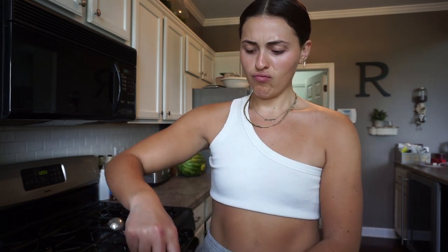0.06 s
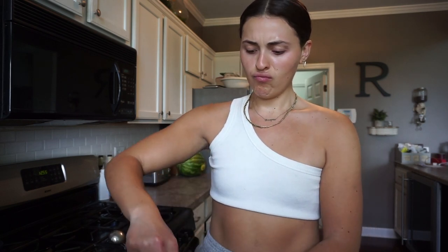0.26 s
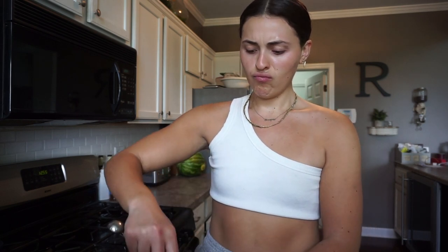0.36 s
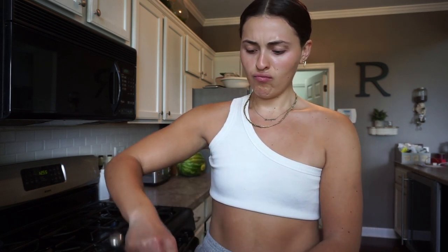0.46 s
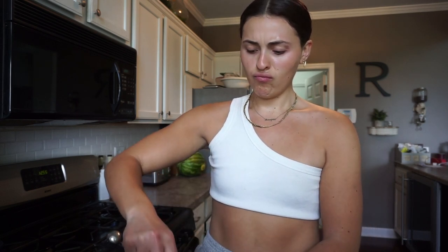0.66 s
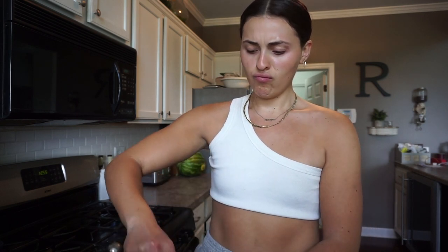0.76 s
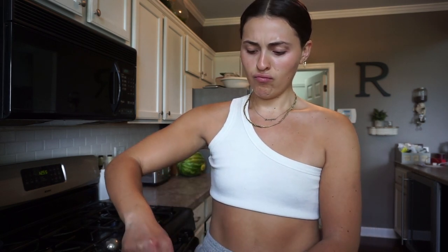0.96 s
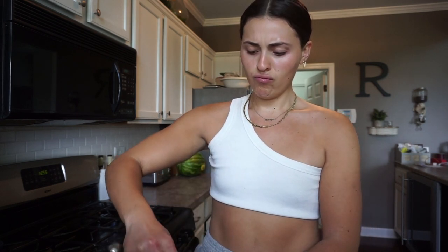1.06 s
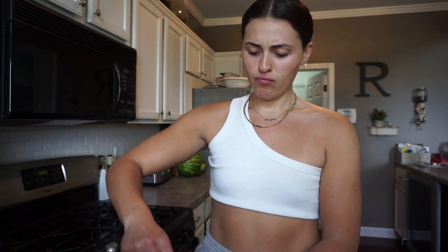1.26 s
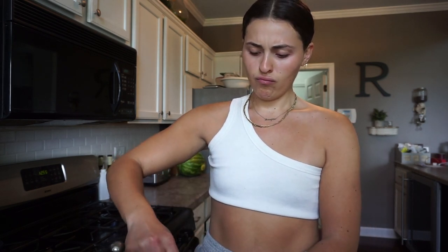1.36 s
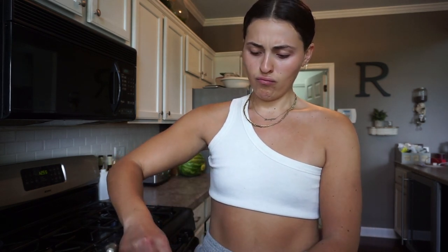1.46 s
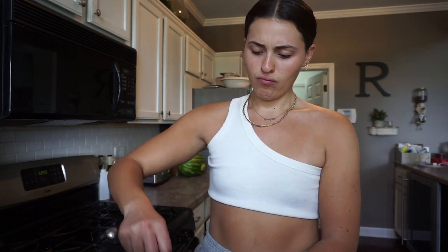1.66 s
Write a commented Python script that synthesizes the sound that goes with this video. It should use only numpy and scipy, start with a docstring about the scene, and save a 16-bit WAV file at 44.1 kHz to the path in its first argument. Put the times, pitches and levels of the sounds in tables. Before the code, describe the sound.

Close stereo pickup of ice cubes being stirred with a spoon in a glass, hollow thuds followed by brighter clinks, one brief glassy knock later on, short room reverberation, and faint hum and hiss beneath.

```python
"""A kitchen counter: a metal spoon stirs ice cubes in a glass near a microphone.
Each knock is a dull thud, a short clink and a noisy tick, with small ice chips; three blows ring the
glass wall. Thuds make the counter hum, clinks ring the spoon: all are decaying sines but the tick.
Near surfaces echo, the hard kitchen adds a tail of about half a second, and quiet hum and hiss lie below."""
import sys
import numpy as np
from scipy import signal
from scipy.fft import rfft, irfft
from scipy.io import wavfile

SR = 44100
rng = np.random.default_rng(int(sys.argv[2]) if len(sys.argv) > 2 else 0)


def generate_wav(signal):
    """Clip the signal to [-1, 1] and save it as 16-bit WAV at the path in sys.argv[1]."""
    frames = np.transpose(np.atleast_2d(signal))
    scaled = np.clip(frames, -1, 1) * 32767
    pcm = np.round(scaled).astype(np.int16)
    wavfile.write(sys.argv[1], SR, pcm)


def gain_from_decibels(decibels):
    """Convert decibel values to linear amplitude factors."""
    exponent = np.asarray(decibels, float) / 20
    return 10 ** exponent


N = 74970  # samples, 1.7 s

# knocks of ice and spoon: (time [s], thud level [dB], thud pitch [Hz], clink level [dB],
# clink pitch [Hz], tick level [dB])
KNOCK_EVENTS = [(.0085,-31,665,-34,2870,-59),(.047,-45,885,-28,2666,-36),(.056,-37.5,556,-41,2380,-49),(.2015,-28,1090,-34,2500,-45),(.2135,-8.5,593,-34,2300,-36),(.222,-20,960,-30,2900,-35.5),(.231,-22.5,500.7,-23,2350,-50),(.2418,-15.5,645,-7.5,2343,-22.5),
                (.494,-31,600,-20.5,2470,-46),(.5025,-11.5,520,-32,2300,-40),(.510,-17,1194,-26.5,2850,-34.5),(.516,-16.5,570,-29,2550,-49),(.5245,-18,633,-37,2150,-36),(.540,-23,460,-46,2470,-66),(.5606,-17,603,-7,2300,-20),
                (.7362,-15,620,-27,2640,-37.5),(.7475,-17.5,1250,-32,2090,-33.5),(.753,-21,500,-23,2270,-50),(.764,-24.5,926,-36,2440,-47),(.7736,-21,650,-6,2342,-20.5),(.875,-32,420,-26,2480,-62),(.918,-32.5,440,-26,2305,-41),
                (.9537,-15,593,-7.5,2207,-18),(.957,-17,660,-12.5,2540,-25.5),(.9625,-18.5,690,-22,2150,-29.5),(1.043,-25.5,417,-39,2300,-44),(1.0535,-24,1110,-25,2520,-24),(1.060,-50,630,-16.5,2600,-23.5),(1.0774,-33,497,-23,2130,-57),
                (1.1042,-37,870,-36,1900,-26),(1.132,-32,636,-14.5,1875,-27.5),(1.140,-26,577,-16,2290,-27.5),(1.354,-39.5,420,-36,2950,-48),(1.3782,-21,626,-7,2299,-21.5),(1.384,-33,467,-17.5,2375,-43),(1.485,-29.5,360,-42,2260,-48)]
CLINK_RISE_S = 0.00081  # also of ticks and splinters


def evened(x):
    """Scales to rms 1."""
    return x / np.sqrt(np.mean(x ** 2) + 1e-20)


def read(points, hz):
    """Reads a table on a log-frequency axis."""
    f, value = np.transpose(points)
    return np.interp(np.log(hz + 1), np.log(f + 1), value)


def coloured(x, points):
    """Filters by a table of (frequency [Hz], gain [dB])."""
    hz = np.fft.rfftfreq(x.shape[-1], 1 / SR)
    return irfft(rfft(x) * gain_from_decibels(read(points, hz)), x.shape[-1])


def add(mix, start_s, sound):
    """Mixes a sound in at start_s, cut at the end of the mix."""
    part = mix[max(round(start_s * SR), 0):][:len(sound)]
    part += sound[:len(part)]


def eased(sound, rise_s):
    """Softens the start of a sound with a squared-sine rise."""
    rise = np.minimum(np.arange(len(sound)) / (rise_s * SR), 1)
    return sound * np.sin(np.pi / 2 * rise) ** 2


def ring(modes, tilt_db_per_octave=0., length_s=.5):
    """Modes of a struck thing: decaying sines, tilted about 1 kHz."""
    t = np.arange(0, length_s, 1 / SR)
    total = np.zeros(len(t))
    for hz, db, t60_s in modes:
        mode_db = db + tilt_db_per_octave * np.log2(hz / 1000)
        total += gain_from_decibels(mode_db - 60 * t / t60_s) * np.sin(2 * np.pi * hz * t)
    return total


def spread(mid, side):
    """Left and right from a shared part and a side part weighted by frequency."""
    # (frequency [Hz], side minus mid [dB])
    side_gain = [(60, -15), (150, -35), (300, -26), (600, -13), (1200, -6), (2400, -4), (6000, 2),
                 (15000, -5.5)]
    side = coloured(side, side_gain)
    return np.array([mid + side, mid - side])


def air():
    """Coloured noise: the kitchen's hum and hiss, plus the dying tail of the stirring just before."""
    # (frequency [Hz], relative density [dB per Hz])
    air_spectrum = [(18, -65), (30, -10), (394, 4.5), (1860, -9.5), (2230, -8), (3670, -18), (9460, -30),
                    (10500, -31), (14000, -28), (16000, -47)]
    steady_db, earlier_db, earlier_t60_s = -56.5, -52, 0.45
    mid, side = coloured(rng.standard_normal((2, N)), air_spectrum)
    gain = gain_from_decibels(steady_db) + gain_from_decibels(earlier_db - 60 * np.arange(N) / SR / earlier_t60_s)
    return gain * spread(mid, side) / mid.std()


def reverb_tail():
    """Random taps, a second long, that die band by band as hard walls absorb them."""
    # decay: (frequency [Hz], t60 [s])
    tail_decay = [(200, 0.6), (450, 0.4), (900, 0.83), (2200, 0.59), (4500, 0.62), (9000, 0.47),
                  (15000, .3)]
    # (frequency [Hz], tail level [dB])
    tail_level = [(200, 5.5), (450, -2), (900, -2.5), (2200, -2.5), (4500, 2.5), (9000, 0), (15000, -5)]
    rise_s, spacing = 0.0038, 20  # spacing in samples
    taps = np.zeros((2, SR))
    slots = np.arange(40, SR - 20, spacing)
    at = slots + rng.integers(0, spacing, (2, len(slots)))
    np.put_along_axis(taps, at, rng.choice([-1., 1.], at.shape), 1)
    hz, t, bands = signal.stft(taps, SR, nperseg=256)
    t60_s = read(tail_decay, hz)[:, None]
    decay = gain_from_decibels(read(tail_level, hz)[:, None] - 60 * t / t60_s)
    unit_energy = np.sqrt(spacing * 6 * np.log(10) / (SR * t60_s))
    tail = signal.istft(bands * decay * unit_energy, SR, nperseg=256)[1][:, :SR]
    rise = 1 - np.exp(-np.arange(SR) / (rise_s * SR))
    return spread(*tail * rise)


def kitchen(x):
    """Convolves with direct sound, near echoes and the tail."""
    # near surfaces: (delay [s], left level [dB], right level [dB])
    near_echoes = [(.0043, -3.5, -2), (.009, -4.5, -11.5), (.013, -15.5, -20), (0.018, -13.5, -9),
                   (.024, -17.5, -14.5), (.046, -14.5, -15.5)]
    skew_s = 0.0001  # largest random extra delay per side
    room = reverb_tail()
    room[[0, 1], [0, 1]] += 1  # direct sound, right one sample later
    for delay_s, *sides_db in near_echoes:
        for side, db in zip(room, sides_db):
            side[round((delay_s + skew_s * rng.random()) * SR)] += gain_from_decibels(db)
    return signal.fftconvolve(x[None], room, axes=1)[:, :N]


def jolts():
    """Each knock shakes the microphone through the counter: a low sine, unevenly left and right."""
    jolt_hz, jolt_t60_s, jolt_re_clink_db = 62.4, 0.034, -36.5
    out = np.zeros((2, N))
    for row, shares in zip(KNOCK_EVENTS, rng.random((len(KNOCK_EVENTS), 2))):
        start_s, clink_db = row[0], row[3]
        jolt = ring([(jolt_hz, clink_db + jolt_re_clink_db, jolt_t60_s)])
        for side, share in zip(out, shares):
            add(side, start_s, share * jolt)
    return out


def glass():
    """Blows on the glass wall ring its modes briefly, brighter or duller by a tilt."""
    # (time [s], level [dB], brightness [dB per octave])
    wall_blows = [(1.0791, -34, 9.5), (1.1044, -11.5, 3.6), (1.1294, -29, -25)]
    # (frequency [Hz], level [dB], t60 [s])
    wall_modes = [(1114, -3.5, 0.032), (1094, -15.5, 0.2), (1620, 1.5, 0.018), (1964, -6.5, 0.011),
                  (2600, -5, 0.026), (3620, -13, 0.015), (4320, -24.5, 0.019)]
    out = np.zeros(N)
    for start_s, db, tilt_db_per_octave in wall_blows:
        add(out, start_s, gain_from_decibels(db) * eased(ring(wall_modes, tilt_db_per_octave), 0.0018))
    return out


def thud_at(db, hz):
    """Dull decaying sine that sets counter and cupboards humming."""
    # (frequency [Hz], level [dB], t60 [s])
    counter_modes = [(221.6, -16, 0.14), (279, -6.5, 0.14), (415.45, -1, 0.39), (458.5, 0, 0.043),
                     (600.3, 8, 0.058), (606, -22.5, 0.05), (865, -12, 0.45), (1068.3, -5, 0.14),
                     (1347, 5.5, 0.016)]
    hum_re_thud_db, t60_s, rise_s = -14.5, 0.018, 0.0012
    hum = gain_from_decibels(hum_re_thud_db) * ring(counter_modes)
    return gain_from_decibels(db) * eased(ring([(hz, 0, t60_s)]) + hum, rise_s)


def clink_at(db, hz):
    """Short decaying sine that rings the spoon's modes."""
    # (frequency [Hz], level [dB], t60 [s])
    spoon_modes = [(2207, -16.5, 0.058), (2300, -38.5, 0.11), (2550, -18, 0.035), (4615, -35, 0.048),
                   (5830, -33, 0.023), (8500, -36, 0.028), (2954, -12, 0.015), (1698, -11, 0.014)]
    return gain_from_decibels(db) * eased(ring([(hz, 0, 0.014)]) + ring(spoon_modes), CLINK_RISE_S)


def unit_ticks():
    """One decaying burst of coloured noise per knock."""
    # (frequency [Hz], relative density [dB per Hz])
    tick_spectrum = [(2500, -7), (3500, -8), (4600, -9), (5200, -15), (5800, -11), (7400, -18.5),
                     (8500, -14), (9600, -19), (10500, -15), (12000, -18), (15500, -22.5), (16500, -45)]
    t60_s, t = 0.014, np.arange(1024) / SR
    noise = rng.standard_normal((len(KNOCK_EVENTS), 1024))
    return evened(coloured(noise, tick_spectrum)) * gain_from_decibels(-60 * t / t60_s)


def splinter(thud_db, pitch):
    """Small ice chip: a brief sine, pitch 0..1 from low to high."""
    low_hz, high_hz, re_thud_db, t60_s = 1210, 4190, -29.5, 0.0081
    hz = low_hz * (high_hz / low_hz) ** pitch
    return eased(ring([(hz, thud_db + re_thud_db, t60_s)], length_s=.02), CLINK_RISE_S)


def knocks():
    """Every knock: thud and its bounce off the counter, clink, tick and splinters."""
    thud_lag_s, bounce_s, bounce_db = 0.00051, 0.00409, -14.5
    splinters, splinter_span_s = 6, 0.035
    out = np.zeros(N)
    ticks = unit_ticks()
    chips = rng.random((len(KNOCK_EVENTS), splinters, 2))
    for event, tick, chip in zip(KNOCK_EVENTS, ticks, chips):
        start_s, thud_db, thud_hz, clink_db, clink_hz, tick_db = event
        thud = thud_at(thud_db, thud_hz)
        add(out, start_s + thud_lag_s, thud)
        add(out, start_s + thud_lag_s + bounce_s, gain_from_decibels(bounce_db) * thud)
        add(out, start_s, clink_at(clink_db, clink_hz))
        add(out, start_s, gain_from_decibels(tick_db) * eased(tick, CLINK_RISE_S))
        for late, pitch in chip:
            add(out, start_s + late * splinter_span_s, splinter(thud_db, pitch))
    return out


def scene():
    """Knocks and glass in the room, over its air."""
    return kitchen(knocks() + glass()) + air()


def roll_off(x):
    """The treble ends steeply here."""
    return signal.sosfilt(signal.butter(12, 16800, fs=SR, output="sos"), x)


def record(dry):
    """The microphone cuts airborne bass, leaks a little of it, and feels the jolts."""
    low_cut_hz, leak_db = 197, -24
    cut = signal.butter(6, low_cut_hz, "highpass", fs=SR, output="sos")
    mix = signal.sosfilt(cut, dry) + gain_from_decibels(leak_db) * dry + jolts()
    return roll_off(mix)


dry = scene()
out = record(dry)
generate_wav(out)
```